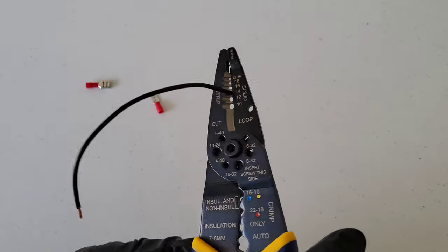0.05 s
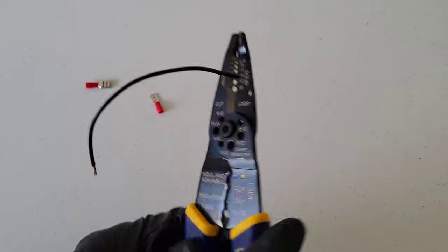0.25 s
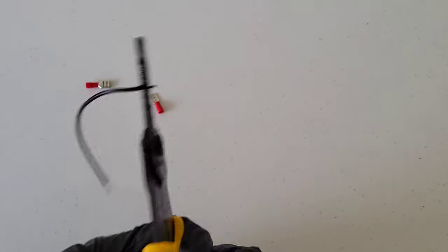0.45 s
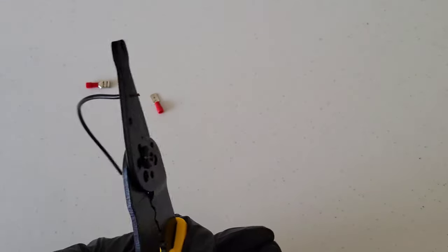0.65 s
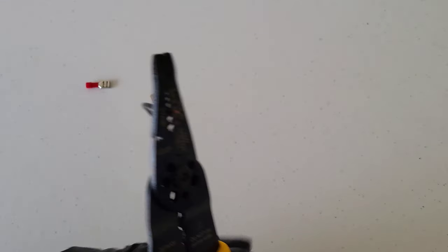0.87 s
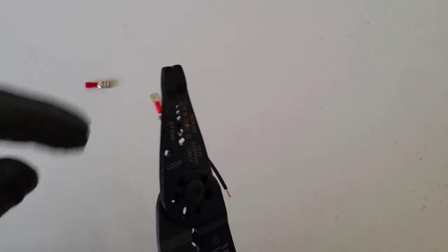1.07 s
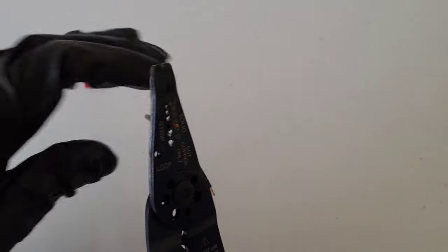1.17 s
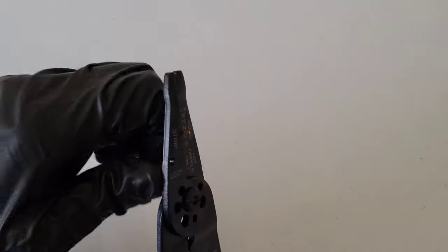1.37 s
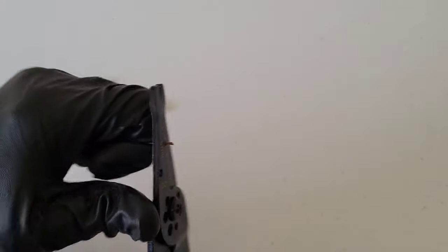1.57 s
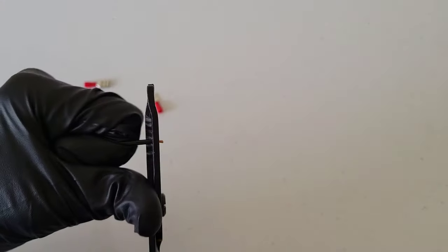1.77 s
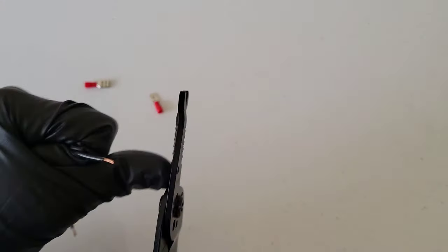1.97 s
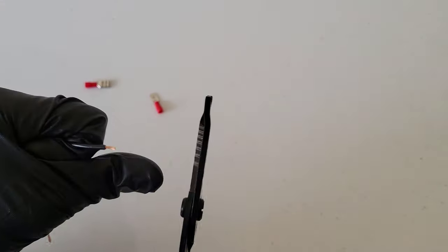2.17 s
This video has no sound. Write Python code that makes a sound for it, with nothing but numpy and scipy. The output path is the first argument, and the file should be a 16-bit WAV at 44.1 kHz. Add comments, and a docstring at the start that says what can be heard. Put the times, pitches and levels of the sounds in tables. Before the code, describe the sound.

Hand wire stripper snaps shut with a sharp metallic click, then insulation pops off amid glove rustle

```python
"""Wire stripper in a garage

Gloved hands work a steel wire stripper over a bench, close by and a little to the left. The gloves rub
(dense friction grains) and squeak (stick-slip jerks in a narrow resonance); wire and grips creak (ringing ticks).
The jaws snap shut through the insulation in a quick rattle of noise bursts and ringing steel modes, and under
the pull the sleeve pops off with hollow modes. A low room rumble, hiss and hum lie underneath."""
import sys
import numpy as np
from scipy import signal
from scipy.fft import rfft, irfft
from scipy.io import wavfile
from scipy.ndimage import uniform_filter1d

SR = 44100
rng = np.random.default_rng(int(sys.argv[2]) if len(sys.argv) > 2 else 0)


def bounce(signal):
    """Save signal as a 16-bit WAV file at the path given by the first command-line argument."""
    frames = np.transpose(np.atleast_2d(signal))
    limited = np.clip(frames, -1, 1)
    pcm = np.round(limited * 32767).astype(np.int16)
    wavfile.write(sys.argv[1], SR, pcm)


N = 98034  # samples

# Room rumble and hiss: spectrum [f/Hz, relative density/dB per Hz]
FLOOR_SPECTRUM = [(12, -10.5), (28, -19), (45, -2.5), (62, -1.5), (85, -3.5), (125, -7), (165, -17.5),
                  (260, -18.5), (420, -23.5), (750, -21.5), (1200, -27.5), (3000, -33), (5500, -43.5),
                  (8500, -59), (15000, -50)]
# Likeness of the room noise in left and right [f/Hz, correlation]
FLOOR_LIKENESS = [(30, 0.7), (100, 1), (250, 0.36), (600, 0.022), (3000, 0.072)]
# Steady hum [f/Hz, rms level on the left/dB]
HUM_TONES = [(50, -54), (137, -67)]
# Gloves sliding: loudness curve [t/s, level/dB]
RUB_CURVE = [(0, -54.5), (.07, -71), (.13, -64.5), (0.159, -56.5), (.19, -71.5), (.25, -62.5),
             (0.301, -49.5), (.35, -49), (.39, -48), (.43, -54), (0.471, -47.5), (.51, -56), (.6, -56),
             (.63, -62), (0.752, -63.5), (0.786, -51), (.81, -58.5), (.85, -52.5), (.89, -58.5), (.98, -46),
             (1.025, -57), (1.049, -49.5), (1.08, -68.5), (1.27, -69), (1.41, -57), (1.48, -50.5),
             (1.622, -64), (1.72, -64), (2.2, -85)]
# Tone of the rubbing [f/Hz, relative level/dB]
RUB_SPECTRUM = [(150, -2), (700, -0.5), (1500, 1.5), (2300, 1.5), (5500, -2.5), (8000, -8), (13500, -10.5),
                (16000, -6.5)]
# Gloves squeaking on the grips, wire scraping in the jaws
# [t of the peak/s, swell and fade time constant/s, level/dB, pitch f/Hz]
SQUEAK_EVENTS = [(0.26, 0.0027, -42.5, 1830), (.293, 0.011, -35, 1990), (.314, 0.02, -46, 2400),
                 (.384, 0.0057, -38, 1580), (.398, 0.0097, -46.5, 1710), (.397, 0.012, -49, 5630),
                 (0.472, 0.012, -51, 4240), (0.488, 0.009, -46.5, 3200), (0.491, 0.011, -48.5, 1770),
                 (0.848, 0.0047, -33, 2960), (.849, 0.0085, -45.5, 4020), (0.979, 0.014, -48.5, 3240),
                 (1.0, 0.013, -51.5, 5670), (1.424, 0.01, -51, 4700), (1.446, 0.021, -48.5, 5150),
                 (1.6, 0.16, -62.5, 1890)]
# Creaks of the wire and the grips [t/s, relative level/dB, resonance f/Hz]
CREAK_TICKS = [(0.3592, -32.5, 3560), (.382, -35, 1750), (0.6535, -35, 2980), (.762, -40.5, 1910),
               (.785, -33.5, 4230), (1.4665, -33.5, 4000), (1.476, -33.5, 4000), (1.507, -31, 5150),
               (1.5396, -36.5, 2300), (1.707, -41, 3100), (1.72, -37.5, 2980), (1.761, -38.5, 1610),
               (1.828, -40.5, 3260), (1.8555, -34, 3160), (1.8805, -36.5, 2880), (1.887, -38, 3100),
               (1.9218, -34.5, 3160), (1.9290, -34.5, 2900)]
# Soft low thumps: two as the hands jerk, the last a low push under the sleeve's pop [t/s, peak level/dB, f/Hz]
LOW_THUMPS = [(1.4634, -38.5, 203), (1.4729, -40, 285), (1.957, -34, 107)]
# Jaws snapping shut [t/s, crack level/dB, steel ring level/dB, dull knock level/dB]
JAW_BLOWS = [(1.3695, -34, -36, -41.5), (1.3722, -23, -22, -33.5), (1.3744, -15.5, -20.5, -43.5),
             (1.3762, -21, -28, -30.5), (1.3778, -15, -21.5, -44), (1.3845, -17, -37, -42),
             (1.3927, -13, -32, -23.5), (1.4, -19.5, -46, -20)]
# Tone of the crack [f/Hz, relative level/dB]
CRACK_SPECTRUM = [(600, -24.5), (1100, -6), (2200, -7), (3400, -4), (4500, 3.5), (6800, -1.5), (9500, -1.5),
                  (12000, -7.5), (14700, -11), (15300, -46)]
# Tone of the knock [f/Hz, relative level/dB]
KNOCK_SPECTRUM = [(100, -10), (350, -19), (900, -23), (1150, 4.5), (1600, -3.5), (3000, -0.5), (5000, -15),
                  (15000, -18)]
# Modes of the handles, rung by the knocks [f/Hz, relative level/dB]
HANDLE_MODES = [(640, -20), (1120, -10), (1265, -13), (2912, -14)]
# Modes of the gripped steel jaws [f/Hz, relative level/dB]
STEEL_MODES = [(4105, -5), (4324, -6), (4450, -7), (5016, -8), (5150, -7), (5290, 0), (5528, -4),
               (5967, -12), (6270, -7), (6927, -9), (7185, -9), (8812, -6), (8920, -2), (9311, -5),
               (9982, -5), (10220, -8), (10660, -9), (11032, -6), (12390, -14)]
# Sleeve tearing free and flicking past the jaws [t/s, level/dB]
SLEEVE_POPS = [(1.9644, -22), (1.966, -14.5), (1.9677, -26), (1.9679, -23), (1.9727, -23)]
# Tone of the pop [f/Hz, relative level/dB]
POP_SPECTRUM = [(250, -22), (600, -6), (1600, -1), (2600, -5), (3250, 1), (3750, -5), (6200, -8),
                (7800, -17), (10500, -13), (15500, -20)]
# Hollow modes of the pop [f/Hz, level/dB]
HOLLOW_MODES = [(675, -20.5), (886, -26), (1178, -25), (1378, -23.5)]
# Bench reflections [t after the direct sound/s, left level/dB, right level/dB]
BENCH_ECHOES = [(.0023, -17, -17), (.0041, -22, -21), (.0077, -25, -24)]
# Decay of the garage's diffuse tail [f/Hz, t60/s]
ROOM_T60 = [(150, 0.62), (800, 0.12), (2000, 0.27), (5300, 0.35), (9000, 0.36), (15000, 0.25)]

FLOOR_DB, FLOOR_PATCH_DB = -49.5, 1.5  # rms level on the left; rms depth of the drifting patches
FLOOR_RIGHT_DB = -2.5  # rumble, hiss and hum are this much softer on the right
RUB_GRAINS_PER_S, RUB_SPREAD_DB = 4000, 3.0  # grains per band; spread of their sizes
RUB_CLUMP_DB = 1  # rms depth of the bunching as the rubber catches
RUB_RING_HZ, RUB_RING_WIDTH_HZ, RUB_RING_DB = 3200, 200, -17.02  # the rubbed tool rings faintly
SQUEAK_STAGE_WIDTH_HZ, SQUEAK_RASP_DB = 660, -11  # width of each of two resonances in series
SLIPS_PER_S, SLIP_SHARE = 400, .25  # mean rate; decay of each slip as a share of its cycle
TICK_S, TICK_WIDTH_HZ, THUMP_CYCLES = 0.00081, 880, 2.3
CRACK_S, KNOCK_S, POP_S = 0.0013, 0.0018, 0.00088  # decay times of the bursts
HANDLES_T60_S, STEEL_T60_S, HOLLOW_T60_S = .035, .055, .024
SHEAR_S, SHEAR_LENGTH_S, SHEAR_DB = 1.366, .046, -27  # the blades crunch through the insulation
CLAMP_S, CLAMP_DB_PER_S, CLAMP_DEPTH_DB = 1.396, 1003.5, 13  # the shut jaws damp each other
PORT_LAG_S = .00034  # the right port hears the tool later
EDGE_HZ = 15700  # top of the band


def amp(db):
    """Decibels to gain."""
    return 10 ** (np.asarray(db) / 20)


def unit(x):
    """Scales to rms 1."""
    return x / np.sqrt(np.mean(x ** 2) + 1e-20)


def read(points, hz):
    """Reads a table on a log-frequency axis."""
    f, value = np.transpose(points)
    return np.interp(np.log(hz + 1), np.log(f), value)


def add(mix, s, sound):
    """Mixes a stereo sound in at time s."""
    part = mix[:, max(round(s * SR), 0):][:, :sound.shape[1]]
    part += sound[:, :part.shape[1]]


def pair(same, size):
    """Two noises with the given correlation."""
    a, b = rng.standard_normal((2, size))
    same = np.clip(same, -1, 1)
    return np.array([a, same * a + np.sqrt(1 - same ** 2) * b])


def colour(x, points, size=4096):
    """Minimum-phase filter of energy 1 with the given spectrum."""
    hz = abs(np.fft.fftfreq(size, 1 / SR))
    log_gain = np.log(amp(read(points, hz)))
    # The Hilbert transform of the log gain supplies the causal phase
    response = np.exp(np.conj(signal.hilbert(log_gain)))
    taps = np.fft.ifft(response).real[:size // 2]
    taps = taps / np.linalg.norm(taps)
    return signal.fftconvolve(x, taps[None], axes=1)[:, :x.shape[1]]


def resonate(x, hz, width_hz):
    """One resonance that keeps the power of white noise."""
    b, a = signal.iirpeak(min(hz, SR / 2 - 1), hz / width_hz, SR)
    return signal.lfilter(b, a, x) * np.sqrt(SR / np.pi / width_hz)


def burst(decay_s, same=0.82, rise_s=0.00011, size=2048):
    """A contact: a spray of tiny impulses with an evened spectrum that dies at once."""
    t = np.arange(size) / SR
    env = np.exp(-t / decay_s) * (1 - np.exp(-t / rise_s))
    z = rfft(pair(same, size) * env)
    flat = irfft(z / (abs(z) + 1e-12))
    x = flat * np.sqrt(np.sqrt(env))
    return x * np.linalg.norm(env) / np.linalg.norm(x, axis=1, keepdims=True)


def ring_out(modes, t60_s):
    """Struck modes that start together and die away, alike on both sides."""
    t = np.arange(SR // 4) / SR
    tones = sum(amp(db) * np.cos(2 * np.pi * hz * t) for hz, db in modes)
    return np.ones((2, 1)) * amp(-60 * t / t60_s) * tones


def room_tone():
    """Rumble and faint hiss, shaped noise with drifting patches, over a hum of steady sines."""
    hz, _, z = signal.stft(pair(0, N), SR, nperseg=4096, noverlap=3072)
    same = np.clip(read(FLOOR_LIKENESS, hz), -1, 1)[:, None]
    patches = uniform_filter1d(rng.standard_normal(z[0].shape), size=30, axis=0)
    patches = unit(uniform_filter1d(patches, size=4, axis=1))
    right = same * z[0] + np.sqrt(1 - same ** 2) * z[1]
    level_db = read(FLOOR_SPECTRUM, hz)[:, None] + FLOOR_PATCH_DB * patches
    z = np.array([z[0], right]) * amp(level_db)
    air = unit(signal.istft(z, nperseg=4096, noverlap=3072)[1][:, :N])
    t, hum = np.arange(N) / SR, np.zeros(N)
    for f, db in HUM_TONES:
        hum += amp(db) * np.sqrt(2) * np.sin(2 * np.pi * (f * t + rng.random()))
    return (amp(FLOOR_DB) * air + hum) * amp([[0], [FLOOR_RIGHT_DB]])


def rubbing(count=9):
    """Dense friction grains follow the sliding gloves; each band bunches on its own as the rubber catches."""
    edges = np.r_[20, np.geomspace(1200, EDGE_HZ, count)]
    grains = np.zeros((2, N))
    for lo, hi in zip(edges, edges[1:]):
        size = amp(RUB_SPREAD_DB * np.minimum(rng.exponential(1, N), 5))
        size = size * (rng.random(N) < RUB_GRAINS_PER_S / SR)
        bunching = unit(uniform_filter1d(rng.standard_normal(N), size=180))
        size = size * amp(RUB_CLUMP_DB * bunching)
        band = signal.butter(4, [lo, hi], "band", fs=SR, output="sos")
        grains += signal.sosfilt(band, unit(pair(0, N) * size))
    grains *= amp(np.interp(np.arange(N) / SR, *np.transpose(RUB_CURVE)))
    tool_ring = amp(RUB_RING_DB) * resonate(grains, RUB_RING_HZ, RUB_RING_WIDTH_HZ)
    return colour(grains + tool_ring, RUB_SPECTRUM)


def squeaks():
    """Rubber sticks and slips: uneven jerks drive a narrow resonance that swells and fades."""
    out = np.zeros((2, N))
    t = np.arange(-SR // 10, SR // 10) / SR
    for s, swell_s, db, hz in SQUEAK_EVENTS:
        # The slip rate is redrawn at short, regular steps
        rate = np.repeat(rng.exponential(1, len(t)), SR // SLIPS_PER_S)[:len(t)]
        turns = np.cumsum(rate) * SLIPS_PER_S / SR
        slips = unit(pair(-0.09, len(t)) * np.exp(-(turns % 1) / SLIP_SHARE))
        tone = resonate(slips, hz, SQUEAK_STAGE_WIDTH_HZ)
        tone = unit(resonate(tone, hz, SQUEAK_STAGE_WIDTH_HZ))
        # Even out the tone's own flutter
        power = abs(uniform_filter1d(tone ** 2, size=300, axis=1))
        tone = tone / np.sqrt(power + 1e-9)
        rasp = amp(SQUEAK_RASP_DB) * resonate(slips, hz, 2 * hz)
        add(out, s + t[0], amp(db) * np.exp(-abs(t) / swell_s) * (tone + rasp))
    return out


def creaks():
    """Single slips of wire and grip ring a resonance; soft low thumps sound as the hands jerk and under the
    sleeve's pop."""
    out = np.zeros((2, N))
    for s, db, hz in CREAK_TICKS:
        slip = burst(TICK_S, same=-0.63, rise_s=0.00021)
        tick = resonate(resonate(slip, hz, TICK_WIDTH_HZ), hz, hz)
        add(out, s, amp(db) * tick / 2)
    for s, db, hz in LOW_THUMPS:
        t = np.arange(0, THUMP_CYCLES / hz, 1 / SR)
        thump = np.hanning(len(t)) * np.sin(2 * np.pi * hz * t)
        add(out, s, amp(db) * thump * np.ones((2, 1)))
    return out


def jaws():
    """Each blow of the closing jaws cracks, knocks and adds energy to the ringing steel."""
    crack, knock, handles, ring = np.zeros((4, 2, N))
    t, blows = np.arange(N) / SR, np.zeros(N)
    for s, crack_db, ring_db, knock_db in JAW_BLOWS:
        add(crack, s, amp(crack_db) * burst(CRACK_S))
        add(knock, s, amp(knock_db) * burst(KNOCK_S))
        add(handles, s, amp(knock_db) * ring_out(HANDLE_MODES, HANDLES_T60_S))
        blows[round(s * SR)] += amp(ring_db) ** 2
    bite = np.hanning(round(SHEAR_LENGTH_S * SR))
    add(crack, SHEAR_S, amp(SHEAR_DB) * bite * pair(0.41, len(bite)))
    # The steel's energy leaks away between blows
    energy_kept = amp(-60 / SR / STEEL_T60_S) ** 2
    energy = signal.lfilter([1], [1, -energy_kept], blows + 1e-20)
    for hz, db in STEEL_MODES:
        ring += amp(db) * np.sqrt(energy) * np.sin(2 * np.pi * (hz * t + rng.random())) / 2
    damping_db = np.clip((t - CLAMP_S) * CLAMP_DB_PER_S, 0, CLAMP_DEPTH_DB)
    return colour(crack, CRACK_SPECTRUM) + colour(knock, KNOCK_SPECTRUM) + handles + ring * amp(-damping_db)


def sleeve():
    """The insulation lets go with a short, hollow pop and flicks past the jaws."""
    out = np.zeros((2, N))
    for s, db in SLEEVE_POPS:
        add(out, s, amp(db) * burst(POP_S, same=0.041))
    out = colour(out, POP_SPECTRUM)
    add(out, SLEEVE_POPS[0][0], -ring_out(HOLLOW_MODES, HOLLOW_T60_S))
    return out


def garage(x, right_db, wet_db, build_s=0.00097, turn_hz=130, count=4):
    """Direct sound at two ports, reflections from the bench, and short diffuse tails fed in turn."""
    out = np.zeros((2, N))
    add(out, 0, x * [[1], [0]])
    add(out, PORT_LAG_S, x * [[0], [amp(right_db)]])
    for s, left_echo_db, right_echo_db in BENCH_ECHOES:
        add(out, s, x * amp([[left_echo_db], [right_echo_db]]))
    for k in range(count):
        hz, t, z = signal.stft(pair(0, SR // 2), SR, nperseg=256)
        decay = amp(-60 * t / read(ROOM_T60, hz)[:, None])
        tail = signal.istft(z * decay, nperseg=256)[1]
        tail *= 1 - np.exp(-np.arange(tail.shape[1]) / SR / build_s)
        tail = tail / np.linalg.norm(tail[0])
        turn = np.cos(np.pi * (turn_hz * np.arange(N) / SR + k / count))
        feed = x[k % 2] * np.sqrt(2 / count) * turn
        out += amp(wet_db) * signal.fftconvolve(feed[None], tail, axes=1)[:, :N]
    return out


def scene():
    """Tool and hands in the garage, over the room tone."""
    mix = room_tone()
    mix += garage(squeaks() + rubbing(), right_db=-4, wet_db=-15)
    mix += garage(creaks(), right_db=-7.5, wet_db=-7)
    mix += garage(jaws(), right_db=-10, wet_db=-20.5)
    mix += garage(sleeve(), right_db=-9.0, wet_db=-14.5)
    return mix


def record(dry):
    """Band limit: a steep linear-phase low-pass."""
    taps = signal.firwin(401, EDGE_HZ, window=("kaiser", 8), fs=SR)
    return signal.oaconvolve(dry, taps[None], "same")


dry = scene()
out = record(dry)
bounce(out)
```